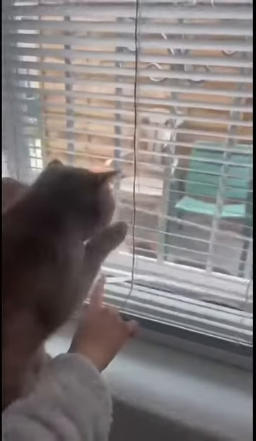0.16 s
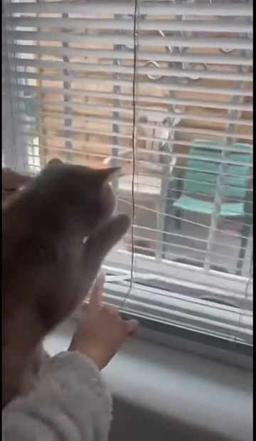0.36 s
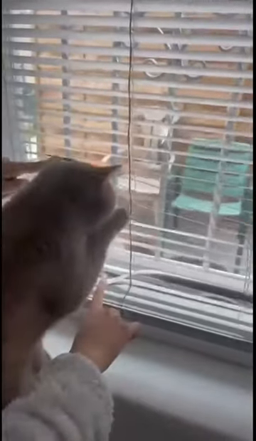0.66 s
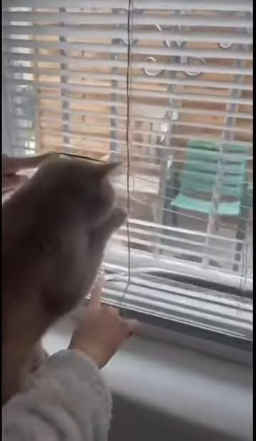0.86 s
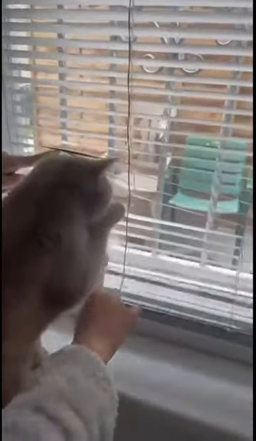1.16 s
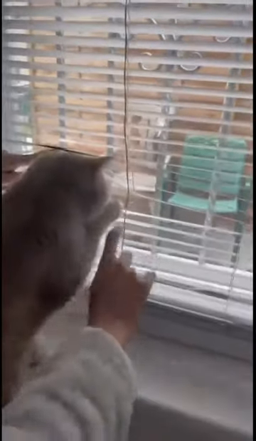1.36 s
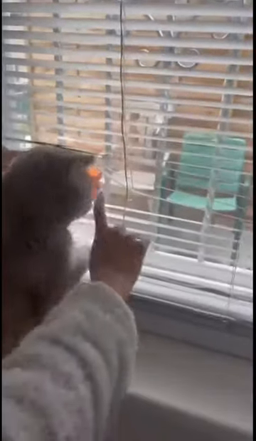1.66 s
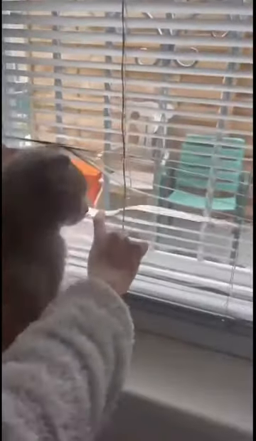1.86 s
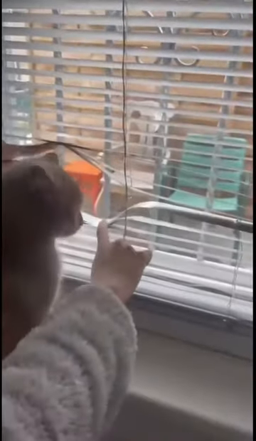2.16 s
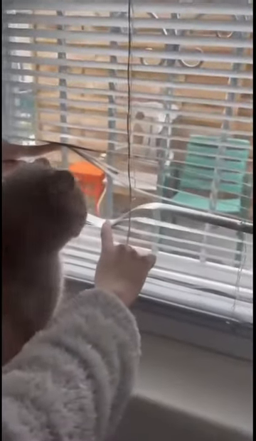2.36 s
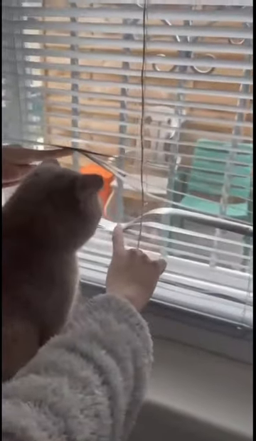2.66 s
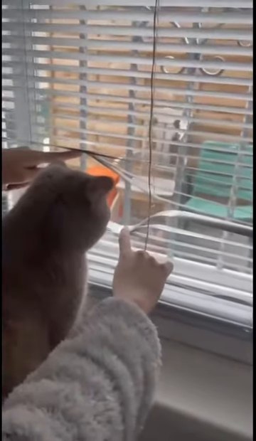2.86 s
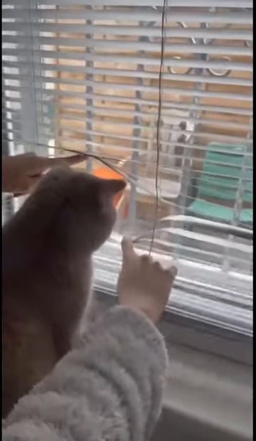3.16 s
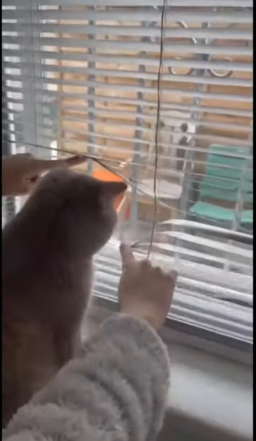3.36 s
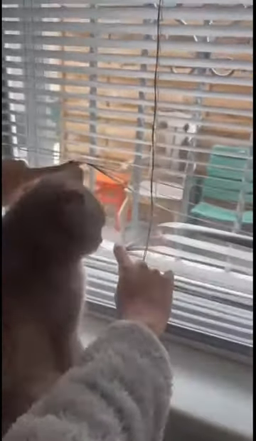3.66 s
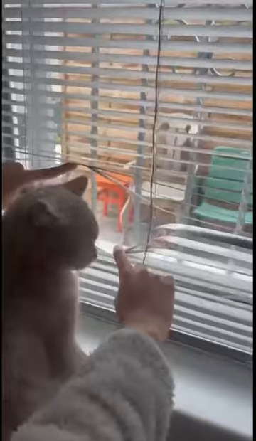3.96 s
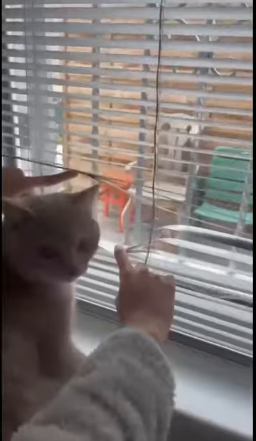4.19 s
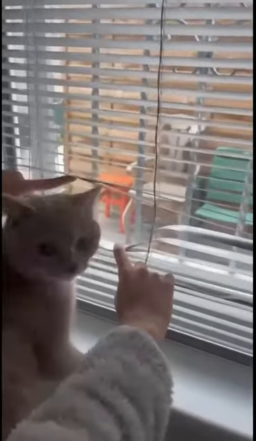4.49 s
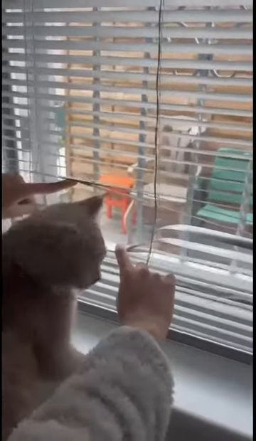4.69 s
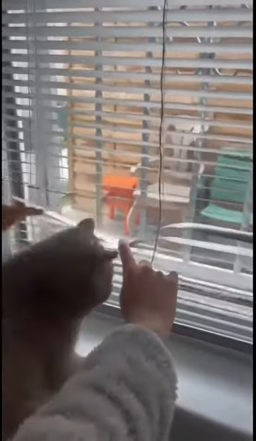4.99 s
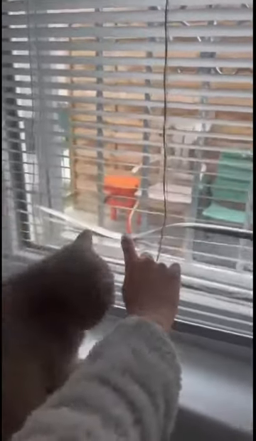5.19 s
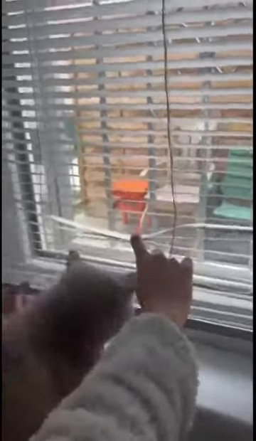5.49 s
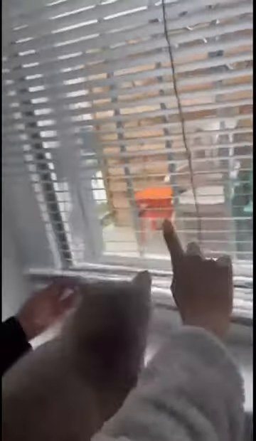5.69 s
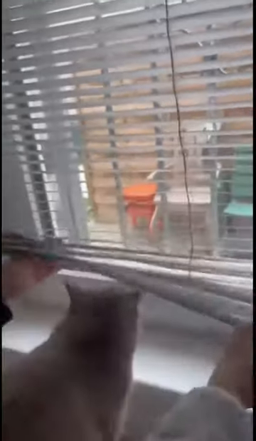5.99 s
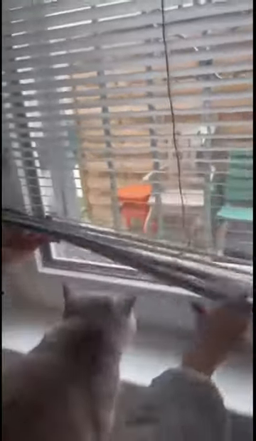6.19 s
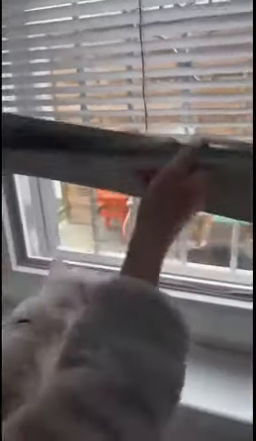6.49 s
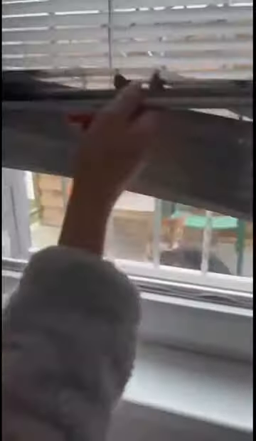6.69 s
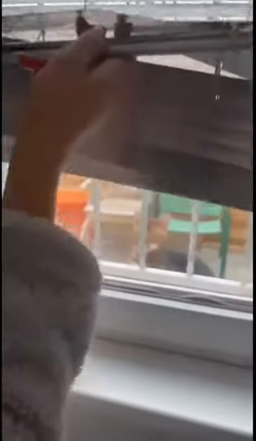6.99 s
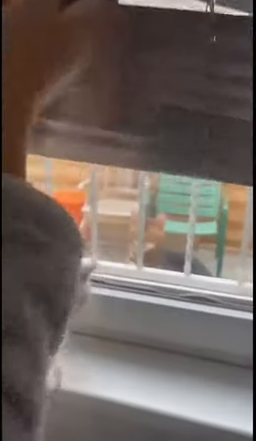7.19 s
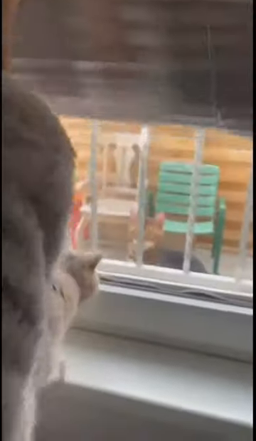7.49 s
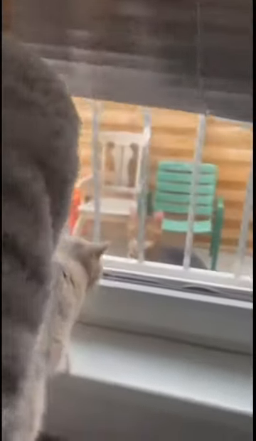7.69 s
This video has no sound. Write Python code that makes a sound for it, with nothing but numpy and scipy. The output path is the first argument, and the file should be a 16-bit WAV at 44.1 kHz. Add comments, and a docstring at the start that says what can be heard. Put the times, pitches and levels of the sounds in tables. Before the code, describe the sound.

Thin blind slats rattle and click close by as a cat's paw and a hand poke at them, with one dull bump of the rail against the window. The handling thins out to light taps and rubs, then builds into sharp cracks and a dense, scraping clatter as the blind is bunched and raised. The small room is otherwise quiet, with a faint hum and slight handling rumble.

```python
"""A small quiet room, close to a window blind, heard through two microphone ports.
A hand and a cat's paw push the thin slats, then the hand gathers them and lifts the stack.
Slats clack, scrape, creak and snap on each other and set the whole blind ringing.
Once the bottom rail knocks the frame and the pane booms. Behind: air, appliance hum, hand rumble."""
import sys
import numpy as np
from scipy import signal
from scipy.fft import rfft, irfft, next_fast_len
from scipy.io import wavfile

SR = 44100
rng = np.random.default_rng(int(sys.argv[2]) if len(sys.argv) > 2 else 0)


def int16_out(signal):
    """Quantize to a 16-bit WAV file."""
    q = np.round(np.clip(np.atleast_2d(signal).T, -1, 1) * 32767)
    wavfile.write(sys.argv[1], SR, q.astype(np.int16))


N = 346185
TIME_S = np.arange(N) / SR
ATTACK_S, USUAL_BLOW_DB = 0.0027, -41

# Slat strikes slat. Each row: start in seconds, treble level in dB, decay in seconds,
# clack (boost at 1.5-4 kHz) in dB, ring relative to treble in dB.
BLOWS = [(0.002, -42, 0.0055, 3.5, -7), (0.057, -43, 0.021, 2, -3.5), (0.078, -28, 0.003, 1, -11),
         (0.124, -36.5, 0.025, 3.5, -10), (0.185, -38.5, 0.032, -1.5, -13.5),
         (0.398, -47.5, 0.021, -1, -15), (0.412, -45, 0.018, 4.5, -3), (0.603, -44.5, 0.019, 4, -9),
         (0.87, -50.5, 0.033, -3.5, -20), (1.006, -42, 0.03, -2, -14), (1.056, -32.5, .015, 7.5, -13),
         (1.075, -35, 0.032, 6, -6), (1.097, -33.5, 0.015, 3.5, -6.5), (1.238, -41.5, 0.023, 10, -8.5),
         (1.372, -42, 0.032, 0, -23), (1.599, -49.5, 0.035, -6.5, -35), (1.667, -48.5, 0.02, 2, -20),
         (1.797, -44.5, 0.057, 6, -19), (1.857, -41, 0.01, 9.5, -4.5), (1.881, -39, 0.016, -4, -25),
         (2.11, -48, 0.016, 1.5, -9.5), (2.188, -53.5, 0.011, -0.5, -20), (2.955, -46, 0.017, 8, -10),
         (2.969, -38.5, 0.012, -5, -22), (3.055, -43.5, 0.0044, -4, -21), (3.715, -38.5, 0.0076, -3.5, -24),
         (3.848, -37.5, 0.012, -1.5, -27), (3.867, -44.5, 0.01, -4, -32), (4.028, -52.5, 0.016, -7, -23),
         (4.058, -41, 0.025, -0.5, -10.5), (4.382, -36.5, 0.015, 4.5, -3.5),
         (4.584, -57.5, 0.0056, -1, -22), (4.787, -42, 0.0063, 2.5, -16), (5.009, -41, 0.0079, -15, -37),
         (5.078, -47, 0.0056, 4, -20), (5.411, -50, 0.0081, -9, -30), (5.465, -43.5, 0.0044, -12, -20),
         (5.509, -38, 0.01, -4, -33), (5.535, -31, 0.015, 1, -36), (5.606, -36, 0.011, 4.5, -9.5),
         (5.767, -35, 0.0068, 3, -35), (5.882, -42, 0.0062, 2.5, -35), (6.029, -49, 0.011, -8, -25),
         (6.064, -42.5, 0.0082, 7, -25), (6.093, -38.5, 0.012, -0.5, -35), (6.15, -40.5, 0.012, 0, -29),
         (6.167, -37.5, 0.0077, 7, -27), (6.186, -28, 0.027, 2, -24), (6.2786, -19.5, 0.0072, -0.5, -2.5),
         (6.425, -38.5, 0.013, 12.5, -6), (6.497, -33.5, 0.025, 2.5, -17.5),
         (6.611, -39.5, 0.012, 1.5, -44), (6.642, -43.5, 0.015, 3.5, -18), (6.761, -48, 0.061, 4, -14),
         (6.8, -31.5, 0.0063, 2, -11.5), (7.04, -36.5, 0.013, 6.5, -28), (7.11, -40, 0.015, 1, -16),
         (7.173, -50, 0.0063, -8, -2), (7.203, -36.5, 0.027, -2, -16), (7.216, -37, 0.027, -4, -10),
         (7.399, -49, 0.0077, 2, -9), (7.42, -41.5, 0.01, 1, -17), (7.613, -44.5, 0.029, 5, -12),
         (7.728, -47, 0.017, 10.5, -20), (7.755, -39.5, 0.0074, 7.5, 1)]
# Slat contact spectrum. Each row: frequency in Hz, density in dB.
SLAT_SPECTRUM = [(250, -12.5), (500, -12), (800, -8.5), (1700, -14.5), (2450, -7.5), (3150, -8.5),
                 (3600, -10), (4300, -8), (4900, -6), (5400, -5.5), (6250, -3.5), (6800, -5), (7450, -4.5),
                 (9000, 2), (10200, 5.5), (10900, -18.5), (11550, -55)]
# Resonances common to all slats. Each row: frequency in Hz, width in Hz, boost in dB.
SLAT_PEAKS = [(2455, 80, 1), (3050, 81, 2), (5560, 65, 3), (6225, 140, 5), (7450, 150, 5.5), (9650, 220, 3)]
# Paw or finger slides a slat. Each row: peak time in seconds, length in seconds, treble level in dB,
# clack in dB.
STROKES = [(0.096, 0.36, -47, 8), (0.284, 0.057, -55, 10.5), (0.452, 0.19, -45.5, 2),
           (0.62, 0.26, -55, 1.5), (0.804, 0.22, -69, -7), (1.002, 0.2, -55, -2), (1.11, 0.18, -51, 2),
           (1.282, 0.2, -52.5, 8), (1.648, 0.13, -58.5, 3), (1.776, 0.12, -56.5, 5.5),
           (1.976, 0.37, -62, 4), (2.293, 0.72, -83, 8.5), (3.004, 0.17, -47.5, -1), (3.138, 0.71, -69, 13),
           (3.258, 0.069, -40.5, -12), (3.299, 0.13, -58.5, 11), (3.542, 0.38, -65, 1),
           (3.795, 0.053, -60.5, 11), (4.067, 0.045, -43, 4.5), (4.124, 0.16, -53, -4),
           (4.21, 0.24, -61, 1.5), (4.56, 0.074, -59.5, 1), (4.75, 0.18, -47, -2), (4.866, 0.028, -57, -21),
           (5.01, 0.14, -44, -2.5), (5.12, 0.071, -55, 5.5), (5.232, 0.13, -58, 1),
           (5.475, 0.16, -50.5, 0.5), (5.882, 0.081, -35.5, -10), (6.041, 0.12, -46.5, -3),
           (6.195, 0.032, -30.5, -3), (6.243, 0.083, -36, 4), (6.661, 0.1, -50.5, 10),
           (6.869, 0.079, -47, 7.5), (7.23, 0.13, -33.5, -0.5), (7.446, 0.057, -45.5, 10)]
# Hand gathers and lifts the stack. Each row: time in seconds, treble floor in dB, 1.5-4 kHz floor in dB.
LIFT_FLOOR = [(5.4, -75.5, -90), (5.47, -67, -82), (5.6, -56.5, -61), (5.69, -56, -62), (5.82, -62.5, -72),
              (5.96, -65.5, -65.5), (6.15, -56.5, -67.5), (6.33, -42, -48), (6.41, -45, -49),
              (6.55, -52, -60.5), (6.87, -72, -69.5), (7.1, -56, -62.5), (7.27, -57.5, -59.5),
              (7.42, -52, -53.5), (7.85, -61, -63.5)]
# Modes of the whole blind. Each row: frequency in Hz, relative level in dB, t60 in seconds.
BLIND_MODES = [(1119, -1, 0.22), (1146, -8, 0.24), (1066, -11, 0.2), (1213, -5, 0.055), (3105, -10.5, 0.15),
               (3930, -17.5, 0.14), (5530, -19.5, 0.12), (5595, -18, 0.14)]
# Bending shifts those modes. Each row: time in seconds, shift in Hz.
BEND_SHIFT = [(0, 8), (0.5, 20), (1.2, 5.5), (3, 0), (4.4, 25), (5.6, 6), (6.3, -3), (7.8, -5.5)]
# Slat flicks straight. Each row: start in seconds, peak in dB, centre in Hz, width in Hz,
# decay in seconds.
SNAPS = [(0.08, -18.5, 8700, 894, 0.0077), (0.3998, -40, 2930, 900, 0.001),
         (1.057, -18, 10800, 894, 0.0046), (3.8485, -28, 7800, 2200, 0.0016),
         (5.537, -17, 10400, 550, 0.0012), (5.537, -26, 2870, 900, 0.0028),
         (5.5513, -30, 6500, 3500, 0.00074), (5.5626, -29, 3300, 1380, 0.0012),
         (5.5836, -36, 2900, 600, 0.0007), (6.096, -33, 6500, 2980, 0.0014),
         (6.2805, -16, 8900, 1790, 0.004), (6.801, -27, 9000, 700, 0.003)]
# Slat hits the stack flat. Each row: start in seconds, peak in dB, note in Hz.
KNOCKS = [(0.4122, -38, 1098), (0.604, -45.5, 1113), (1.057, -57, 1160), (1.799, -39, 1183),
          (1.858, -37.5, 1176), (2.954, -49, 1170), (4.062, -43, 1123), (6.189, -41, 1240),
          (6.371, -38, 1120), (7.757, -45, 1093)]
# Modes of a flat knock. Each row: ratio to the note, relative level in dB, t60 in seconds.
KNOCK_MODES = [(0.36, -11.5, 0.069), (0.64, -9.5, 0.045), (1, 1, 0.06), (1.24, -6, 0.05), (1.82, -11, 0.04),
               (2.1, -5.5, 0.07)]
# Edge sticks and creaks. Each row: peak time in seconds, length in seconds, pitch in Hz,
# glide in Hz per second, flutter width in Hz, level in dB.
SQUEAKS = [(0.06, 0.02, 3140, 0, 250, -50.5), (0.294, 0.07, 3133, 2, 202, -66.5),
           (0.465, 0.03, 1930, -8000, 352, -62), (3.228, 0.012, 2010, 0, 300, -62.5),
           (3.255, 0.048, 1787, -7000, 199, -54.5), (3.318, 0.011, 5210, -3, 150, -54.5),
           (5.123, 0.081, 1582, 2, 70, -68.5)]
# Bottom rail modes. Each row: frequency in Hz, relative level in dB, t60 in seconds.
RAIL_MODES = [(197, -7, 0.31), (292, -10, 0.2), (990, -8.5, 0.18), (1129, -5, 0.58), (1440, -1, 0.34),
              (1466, -15, 0.13), (1970, -6.5, 0.22), (2046, 1.5, 0.22), (2600, -2.5, 0.15),
              (2880, -4, 0.13), (3330, -3.5, 0.21), (4600, 5.5, 0.069)]
# Hollow pops. Each row: start in seconds, final pitch in Hz, length in seconds, peak in dB.
POPS = [(5.5622, 950, 0.0016, -22), (5.5831, 1130, 0.0016, -22.5)]
# Hush while the stack is gathered. Each row: time in seconds, level in dB.
HUSH_LEVEL = [(5.25, -82.5), (5.52, -61), (5.57, -52), (5.63, -54.5), (5.8, -58.5), (6.2, -63.5),
              (6.75, -63.5), (6.9, -75)]
# Rumble of the hand holding the microphone. Each row: time in seconds, level in dB.
RUMBLE_LEVEL = [(0, -66.5), (1.2, -73.5), (1.8, -64.5), (2.4, -80.5), (5.2, -72), (5.6, -67.5), (5.9, -63),
                (6.1, -93), (6.6, -65), (7.85, -65)]
# Noise spectra. Each row: frequency in Hz, relative density in dB.
CRACK_SPECTRUM = [(1500, -30), (5000, -10), (8000, -2), (10500, 0), (11300, -10), (12000, -28)]
FRAME_SPECTRUM = [(40, -12), (110, 0), (200, -5), (420, -9), (750, -10), (1500, -30)]
RATTLE_SPECTRUM = [(300, -20), (800, 1), (1200, -3), (2600, -13), (4500, -30)]
HUSH_SPECTRUM = [(30, -2), (120, -5.5), (500, -5), (1200, -11.5), (3000, -20.5), (8000, -42.5)]
RUMBLE_SPECTRUM = [(15, -15.5), (40, -7.5), (60, -1), (110, -12), (300, -10), (1000, -53.5)]
AIR_SPECTRUM = [(15, -49.5), (25, -7), (60, -0.5), (141, -3), (183, -9.5), (243, -0.5), (314, -10),
                (345, -7), (430, -15.5), (718, -10.5), (861, -23), (6460, -39), (7740, -35.5),
                (10800, -54.5), (12000, -64.5), (15600, -78), (22000, -120)]
# Distant appliance. Each row: frequency in Hz, level in dB.
HUM_LINES = [(60, -75), (235, -80), (351, -76)]
# Room decay. Each row: frequency in Hz, t60 in seconds.
ROOM_T60 = [(150, 0.9), (1000, 0.32), (4000, 0.26), (10000, 0.09)]
# Microphone ports. Each row: frequency in Hz, coherence 0-1, left lead in radians, right over left in dB.
PORTS = [(60, 1, -2, 1.5), (318, 0.72, 0.74, 3), (507, 0.6, 1.04, 2), (800, 0.43, 3.5, 1),
         (1090, 0.4, 0.58, -4), (1970, 0.9, 1, 0), (2860, 0, -0.15, 0.5), (3860, 0, 2, 2.5),
         (4660, 1, 2, -2), (5200, 0.9, 5, 4), (5400, 1, 5.5, 0), (6280, 0.95, 6.5, 0), (7040, 0.85, 7.5, 1),
         (8160, 1, 9, -1), (9890, 1, 9.5, 0.6), (10180, 0.93, 10, 0), (10690, 1, 9, 1),
         (12000, 0.9, 12, -0.5)]


def clacks():
    """Slat strikes slat; flat blows have more body, hard ones less."""
    out = np.zeros((2, N))
    for start_s, db, decay_s, clack_db, _ in BLOWS:
        body_db = 1.36 + 0.91 * clack_db - 0.74 * (db - USUAL_BLOW_DB)
        add(out, start_s, gain_of(db) * convolve(burst(decay_s), slat_response(clack_db, body_db)))
    return out


def burst(decay_s):
    """A quick run of contacts spreads along the slats; rms about 1 at its height."""
    t = TIME_S[:SR // 3]
    envelope = np.minimum(t / ATTACK_S, 1) * np.exp(-np.maximum(t - ATTACK_S, 0) / decay_s)
    contacts = friction(len(t), slips_per_s=1800, spread_db=-0.5, smooth=1.0)
    return unit_rms(envelope * contacts) * np.sqrt(np.mean(envelope ** 2))


def friction(size, slips_per_s, spread_db, smooth, slip_s=0.00042):
    """Tiny uneven slips over a smooth rub, rms 1."""
    onsets = rng.random(size) < slips_per_s / SR
    slips = onsets * gain_of(spread_db * np.minimum(rng.exponential(1, size), 4))
    power = signal.lfilter([1], [1, -np.exp(-1 / (slip_s * SR))], slips)
    envelope = np.sqrt(power / (power.mean() + 1e-12) + smooth)
    return unit_rms(envelope * rng.standard_normal((2, size)))


def slat_response(clack_db, body_db, ripple_db=5.5, size=2048):
    """Impulse response of one slat: common and random resonances, plus clack and body."""
    hz = np.fft.rfftfreq(size, 1 / SR)
    boost = [(100, body_db - 5.5), (200, body_db), (850, body_db), (1550, (body_db + clack_db) / 2),
             (2400, clack_db), (4200, clack_db), (5600, 0)]
    scatter = np.interp(hz, np.linspace(0, SR / 2, 150), rng.standard_normal(150))
    own_db = ripple_db * np.minimum(scatter, 1.4) * (hz > 1400)
    common_db = sum(db / (1 + (2 * (hz - peak_hz) / width_hz) ** 2)
                    for peak_hz, width_hz, db in SLAT_PEAKS)
    gain = gain_of(at_hz(SLAT_SPECTRUM, hz) + common_db + at_hz(boost, hz) + own_db)
    gain *= (hz ** 2 + 1) / (hz ** 2 + 80 ** 2)  # thin slats radiate no bass
    gain /= np.sqrt(np.mean(gain ** 2 * (hz > 5000)))  # unit treble power
    log_gain = np.log(np.r_[gain, gain[-2:0:-1]])
    minimum_phase = np.exp(np.conj(signal.hilbert(log_gain)))
    return irfft(minimum_phase[:len(hz)], size)


def rubbing(over_floor_db=5.5, lift_clack_db=8, drag_s=0.021, edge_db=-21.5, rise_share=0.47):
    """Sliding amplitude and clack in dB over time: the lift, single strokes, drag around each blow."""
    time_s, treble_db, middle_db = np.transpose(LIFT_FLOOR)
    power = gain_of(np.interp(TIME_S, time_s, treble_db, left=-110) + over_floor_db) ** 2
    weighted_clack = power * (np.interp(TIME_S, time_s, middle_db - treble_db) + lift_clack_db)
    drags = [(start_s + 0.00072, drag_s, db - 10, clack_db) for start_s, db, _, clack_db, _ in BLOWS]
    for peak_s, length_s, db, clack_db in STROKES + drags:
        near = abs(TIME_S - peak_s) < 2 * length_s
        offset = (TIME_S[near] - peak_s) / length_s
        fade_db = edge_db * np.maximum(-offset / rise_share, offset / (1 - rise_share))
        stroke_power = gain_of(db + fade_db) ** 2
        power[near] += stroke_power
        weighted_clack[near] += stroke_power * clack_db
    return np.sqrt(power), weighted_clack / power


def sliding(strength, clack_db, trim_db=-1.0, size=4096):
    """Edges scrape in dense slips; another slat takes over about twenty times a second."""
    out, window = np.zeros((2, N)), np.sqrt(np.hanning(size))
    for start in range(0, N, size // 2):
        slips = window * friction(size, slips_per_s=450, spread_db=3.0, smooth=0.6)
        local_db = clack_db[min(start + size // 2, N - 1)]
        add(out, start / SR, convolve(slips, slat_response(local_db, body_db=1 + 0.97 * local_db)))
    return gain_of(trim_db) * strength * out


def ticks(strength, taps_per_s=45, spread_db=3.5, trim_db=0.5, slats=6):
    """Loose slats tap at random, as hard as the blind is moved."""
    out = np.zeros((2, N))
    for _ in range(slats):
        onsets = rng.random(N) < taps_per_s / slats / SR
        taps = strength * onsets * gain_of(spread_db * np.minimum(rng.exponential(1, N), 2))
        tick = convolve(burst(decay_s=0.0057), slat_response(clack_db=-2.0, body_db=-4.0))
        out += signal.oaconvolve(taps[None], tick[:, :SR // 20], axes=1)[:, :N]
    return gain_of(trim_db) * out


def blind_ring(strength, clack_db, blow_db=-2.0, slide_db=-17.0, detune=0.0058):
    """Scrapes and blows ring the whole blind, mono; modes vary per blow and shift with bending."""
    response, t = ringing(BLIND_MODES), TIME_S[:SR // 3]
    scrape = strength * gain_of(slide_db + clack_db) * rng.standard_normal((1, N))
    out = convolve(scrape, response / np.linalg.norm(response))
    for start_s, db, decay_s, _, ring_db in BLOWS:
        modes = [(hz * (1 + detune * rng.uniform(-1, 1)), mode_db + rng.uniform(-0.5, 0.5), t60_s)
                 for hz, mode_db, t60_s in BLIND_MODES]
        swell = 1 - np.exp(-t / (0.35 * decay_s))  # builds while the blow lasts
        ring = unit_rms(ringing(modes)[:len(t)] * swell)
        add(out, start_s, gain_of(db + ring_db + blow_db) * burst(decay_s).std() * ring)
    shift_cycles = np.cumsum(np.interp(TIME_S, *np.transpose(BEND_SHIFT))) / SR
    analytic = signal.hilbert(out, next_fast_len(N))[:, :N]
    return (analytic * np.exp(2j * np.pi * shift_cycles)).real


def cracks(trim_db=-7.0, growth_db_per_db=0.42, decay_s=0.0029):
    """A buckling slat gives a thin mono crack that grows faster than the blow."""
    out, fizz = np.zeros((2, N)), noise(CRACK_SPECTRUM, channels=1)
    t = TIME_S[:SR // 20]
    envelope = np.minimum(t / ATTACK_S, 1) * np.exp(-t / decay_s)
    for start_s, db, *_ in BLOWS:
        crack = fizz[:, round(start_s * SR):][:, :len(t)]
        crack_db = db + trim_db + growth_db_per_db * (db - USUAL_BLOW_DB)
        add(out, start_s, gain_of(crack_db) * crack * envelope[:crack.shape[1]])
    return out


def snaps(rise_s=0.0003):
    """A bent slat flicks straight: a dry snap, pitched by the length that lets go."""
    out, t = np.zeros((2, N)), TIME_S[:2048]
    hz = np.fft.rfftfreq(len(t), 1 / SR)
    for start_s, db, centre_hz, width_hz, decay_s in SNAPS:
        band = np.exp(-((hz - centre_hz) / width_hz) ** 2 / 2)
        fizz = irfft(band * np.exp(2j * np.pi * rng.random((2, len(hz)))))
        snap = fizz * np.minimum(t / rise_s, 1) * np.exp(-t / decay_s)
        add(out, start_s, gain_of(db) * snap / abs(snap).max(1, keepdims=True))
    return out


def knocks(bounce_s=0.0032, bounce_db=-1.0):
    """A flat blow chatters three times within milliseconds: a short, hollow knock."""
    out = np.zeros((2, N))
    for start_s, db, note_hz in KNOCKS:
        knock = np.zeros((2, SR // 2))
        for bounce in range(3):
            ring = ringing([(note_hz * ratio, mode_db + rng.uniform(-0.5, 0.5), t60_s)
                            for ratio, mode_db, t60_s in KNOCK_MODES])
            add(knock, bounce_s * bounce * rng.uniform(0.7, 1.3), gain_of(bounce_db * bounce) * ring)
        add(out, start_s, gain_of(db) * knock / abs(knock).max())
    return out


def squeaks(octave_db=-7.0, roughness=0.76):
    """Stick-slip creaks: a rough tone and its octave; some sag as the slat lets go."""
    out = np.zeros((2, N))
    for peak_s, length_s, hz, glide_hz_per_s, width_hz, db in SQUEAKS:
        t = TIME_S[:int(length_s * SR)] - length_s / 2
        phase = 2 * np.pi * (hz * t + glide_hz_per_s * t ** 2 / 2)
        white = rng.standard_normal((2, SR // 4))
        flutter = signal.lfilter([1], [1, -np.exp(-np.pi * width_hz / SR)], white)
        shimmer, jitter = unit_rms(flutter)[:, -len(t):]
        tone = np.sin(phase + roughness * jitter) + gain_of(octave_db) * np.sin(2 * phase + jitter)
        envelope = (1 + roughness * shimmer) * np.hanning(len(t))
        add(out, peak_s - length_s / 2, gain_of(db) * unit_rms(tone * envelope))
    return out


def rail(start_s=1.239, db=-48.5):
    """The bottom rail knocks on the frame and rings."""
    out = np.zeros((2, N))
    add(out, start_s, gain_of(db) * ringing(RAIL_MODES))
    return out


def frame_thud(start_s=1.24, db=-55.5, rise_s=0.004, decay_s=0.079):
    """The frame takes the rail's knock with a dull, rough bump."""
    t = np.maximum(TIME_S - start_s, 0)
    return gain_of(db) * np.minimum(t / rise_s, 1) * np.exp(-t / decay_s) * noise(FRAME_SPECTRUM)


def pane(hz=61.2, boom_db=-48.5, linger_db=-63.0):
    """After the knock the pane swells into a low boom; a little lingers."""
    boom = gain_of(boom_db) * np.exp(-((TIME_S - 1.375) / 0.091) ** 2)
    linger = gain_of(linger_db) * np.exp(-((TIME_S - 1.7) / 0.33) ** 4)
    return (boom + linger) * np.sin(2 * np.pi * hz * TIME_S)


def pops(overshoot=1.4, fall_s=0.00065, tail_db=-14.0, tail_s=0.013):
    """Two hollow pops drop in pitch and leave a short rattle."""
    out, rattle = np.zeros(N), noise(RATTLE_SPECTRUM, channels=1)[0]
    for start_s, hz, length_s, db in POPS:
        t = np.maximum(TIME_S - start_s, 0)
        cycles = hz * (t + overshoot * fall_s * (1 - np.exp(-t / fall_s)))
        envelope = 2 * t / length_s * np.exp(1 - 2 * t / length_s)
        tail = gain_of(tail_db) * (t > 0) * np.exp(-t / tail_s) * rattle
        out += gain_of(db) * (envelope * np.sin(2 * np.pi * cycles) + tail)
    return out


def hush():
    """A dull hush while the stack is gathered."""
    level_db = np.interp(TIME_S, *np.transpose(HUSH_LEVEL), left=-120, right=-120)
    return gain_of(level_db) * noise(HUSH_SPECTRUM, channels=1)[0]


def room_tone(air_db=-69.0):
    """Still air, a distant appliance's wavering hum and the rumble of the holding hand."""
    hum = sum(gain_of(db) * noise([(hz * 0.97, -90), (hz, 0), (hz * 1.03, -90)]) for hz, db in HUM_LINES)
    rumble = gain_of(np.interp(TIME_S, *np.transpose(RUMBLE_LEVEL))) * noise(RUMBLE_SPECTRUM)
    return gain_of(air_db) * noise(AIR_SPECTRUM) + hum + rumble


def room(x, wet_db=-7.0, predelay_s=0.0031):
    """Adds dense small-room reflections; treble dies first."""
    hz, t, spectra = signal.stft(rng.standard_normal((2, SR // 2)), SR, nperseg=256)
    decay = gain_of(-60 * t / at_hz(ROOM_T60, hz)[:, None])
    tail = signal.istft(spectra * decay, SR, nperseg=256)[1]
    tail *= TIME_S[:tail.shape[1]] > predelay_s
    return x + gain_of(wet_db) * convolve(x, tail / np.linalg.norm(tail[0]))


def ports(x):
    """The right port hears partly the left's wave, phase-shifted, and partly its own."""
    size = next_fast_len(N + 4096)
    hz = np.fft.rfftfreq(size, 1 / SR)
    left, own = rfft(x, size)
    port_hz, *columns = np.transpose(PORTS)
    coherence, lead_rad, right_db = (np.interp(hz, port_hz, column) for column in columns)
    right = (coherence * left + np.sqrt(1 - coherence ** 2) * own) * np.exp(-1j * lead_rad)
    return irfft(np.array([left * gain_of(-right_db / 2), right * gain_of(right_db / 2)]), size)[:, :N]


def noise(spectrum, channels=2):
    """Steady coloured noise, rms 1."""
    white = rfft(rng.standard_normal((channels, N)))
    return unit_rms(irfft(white * gain_of(at_hz(spectrum, np.fft.rfftfreq(N, 1 / SR))), N))


def ringing(modes):
    """Half a second of decaying sines."""
    t = TIME_S[:SR // 2]
    return sum(gain_of(db - 60 * t / t60_s) * np.sin(2 * np.pi * hz * t) for hz, db, t60_s in modes)


def gain_of(db):
    return 10 ** (np.asarray(db) / 20)


def unit_rms(x):
    return x / np.sqrt(np.mean(x ** 2) + 1e-20)


def at_hz(points, hz):
    """Interpolates (Hz, value) points on a log-frequency axis."""
    point_hz, values = np.transpose(points)
    return np.interp(np.log(hz + 1), np.log(point_hz + 1), values)


def add(mix, start_s, sound):
    """Mixes in place, cut at the end of the mix."""
    part = mix[:, max(round(start_s * SR), 0):][:, :sound.shape[-1]]
    part += sound[..., :part.shape[-1]]


def convolve(x, taps):
    """Filters each channel, keeping its length."""
    return signal.fftconvolve(x, np.atleast_2d(taps), axes=1)[:, :x.shape[1]]


def scene():
    """The blind in its room, at the two ports."""
    strength, clack_db = rubbing()
    blind = clacks() + sliding(strength, clack_db) + ticks(strength) + rail() + frame_thud() + squeaks()
    stereo = ports(room(blind) + snaps() + room_tone()) + room(knocks())
    centred = cracks() + blind_ring(strength, clack_db) + pane()
    antiphase = np.outer([1, -1], pops() + hush())
    return stereo + centred + antiphase


def record(dry):
    """Low-pass at 11.9 kHz."""
    taps = signal.firwin(255, 11900, window=("kaiser", 8), fs=SR)
    return signal.oaconvolve(dry, taps[None], "same")


dry = scene()
out = record(dry)
int16_out(out)
```